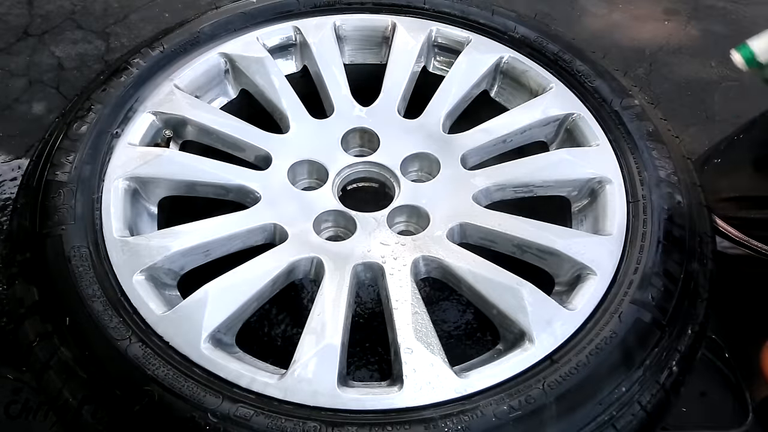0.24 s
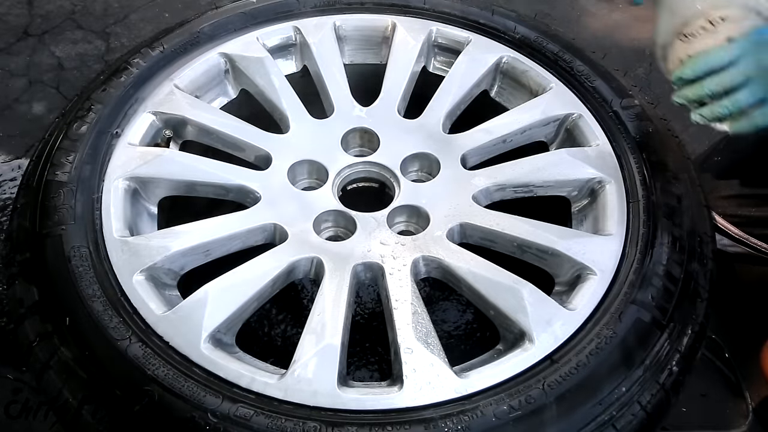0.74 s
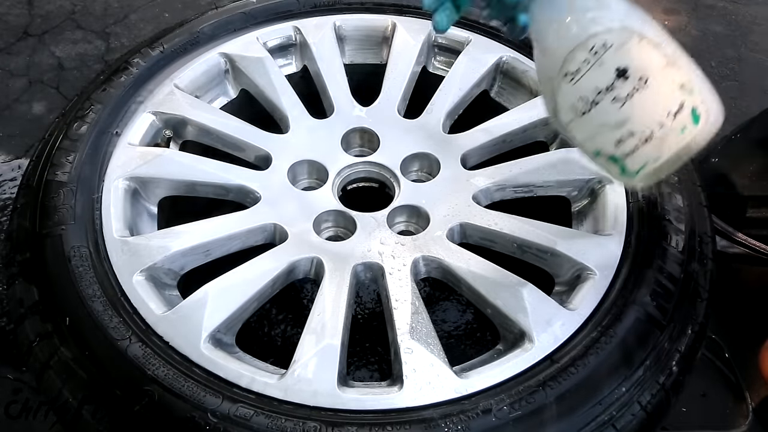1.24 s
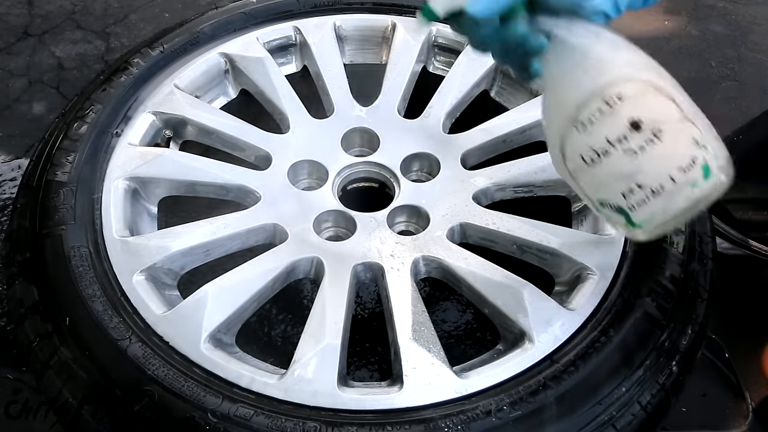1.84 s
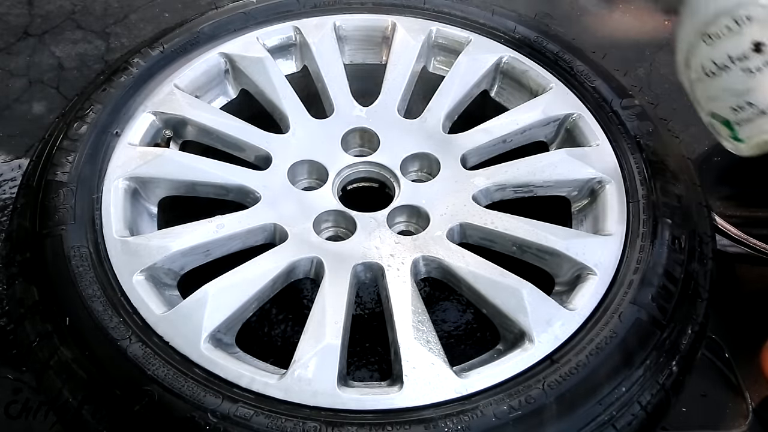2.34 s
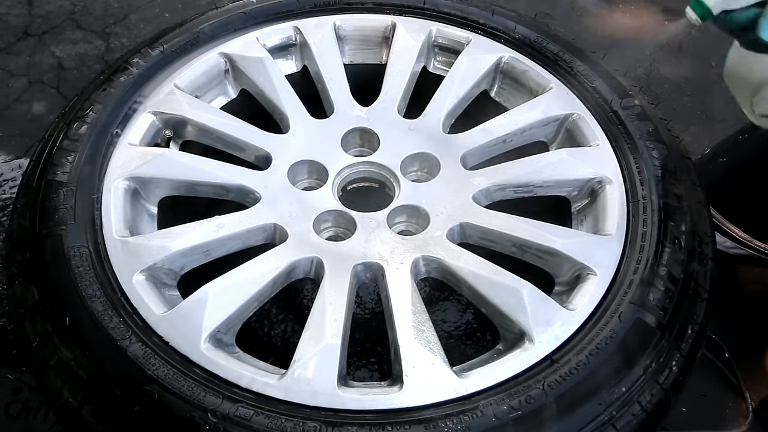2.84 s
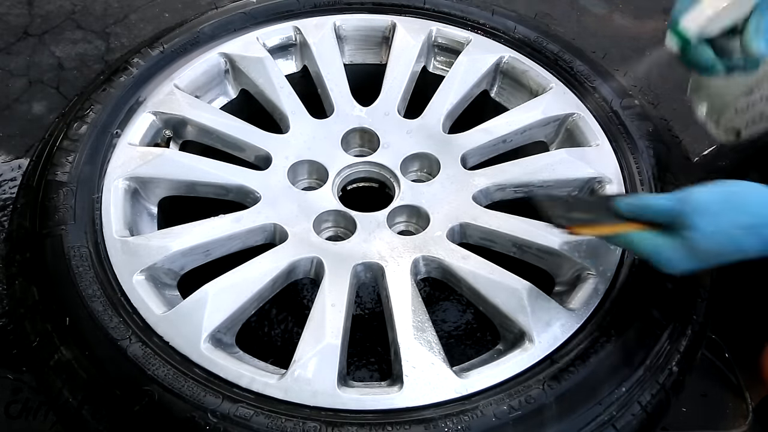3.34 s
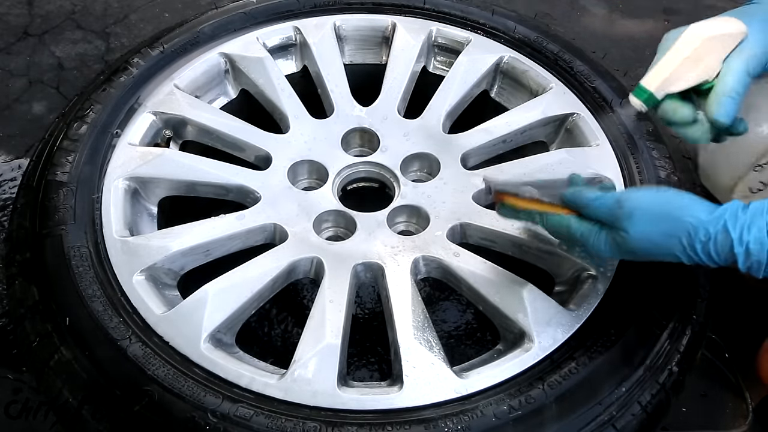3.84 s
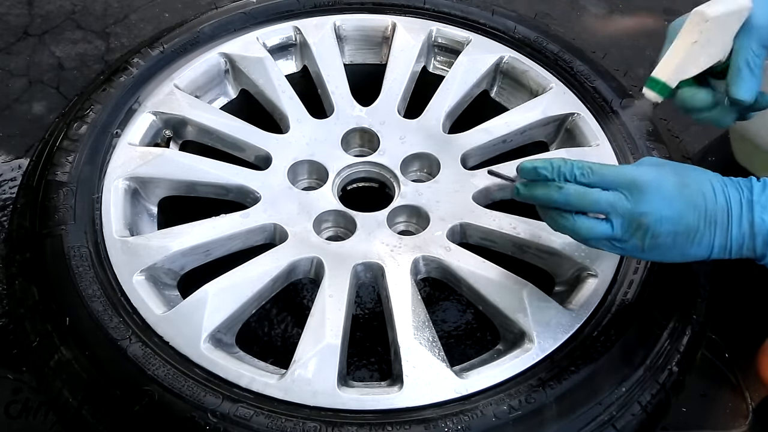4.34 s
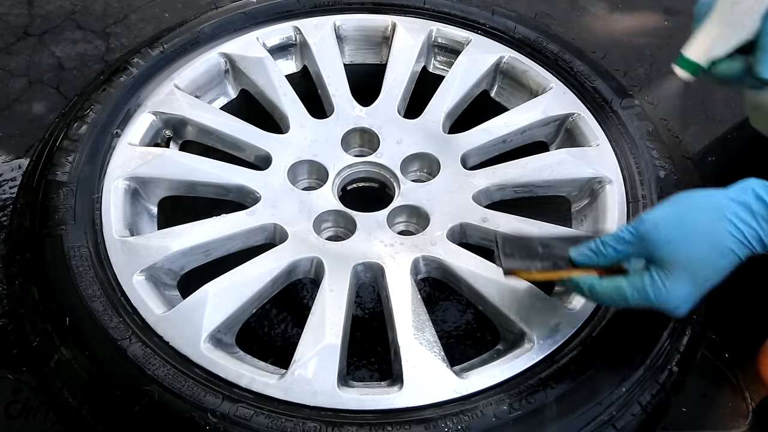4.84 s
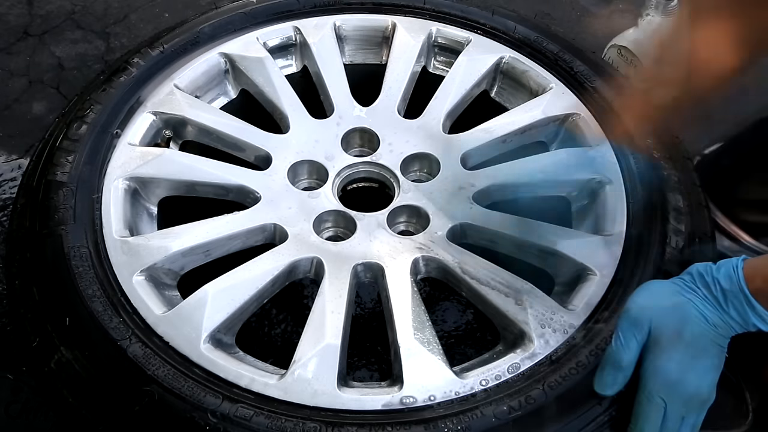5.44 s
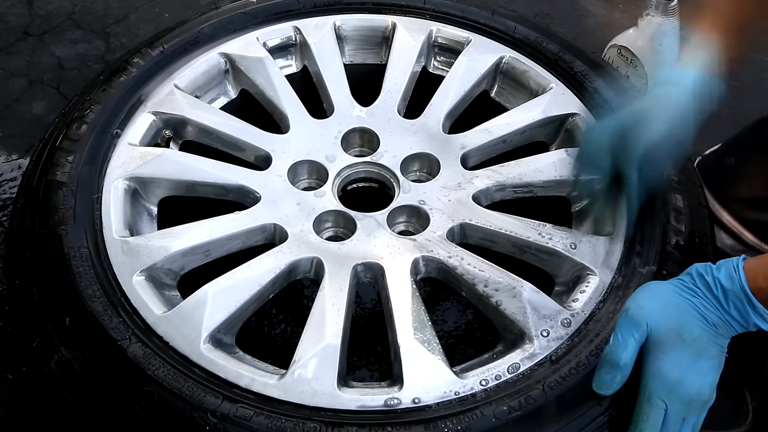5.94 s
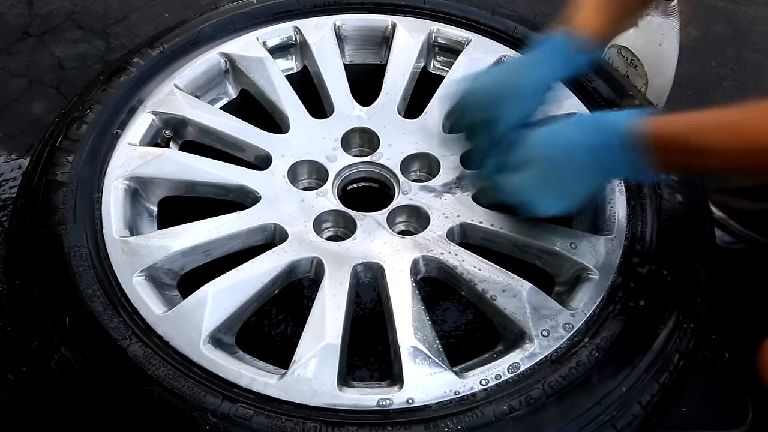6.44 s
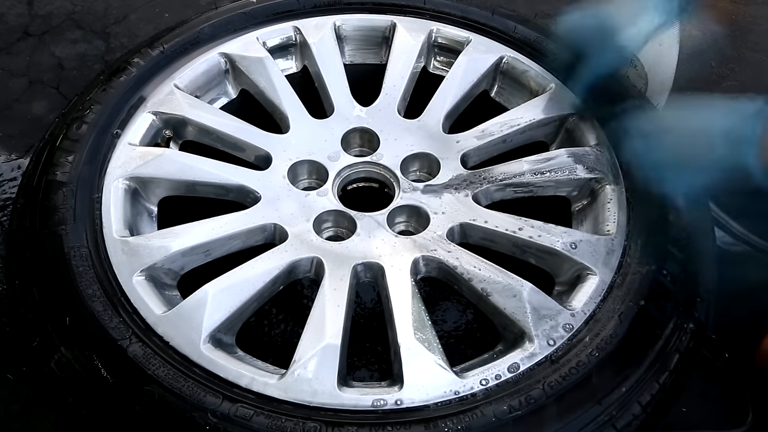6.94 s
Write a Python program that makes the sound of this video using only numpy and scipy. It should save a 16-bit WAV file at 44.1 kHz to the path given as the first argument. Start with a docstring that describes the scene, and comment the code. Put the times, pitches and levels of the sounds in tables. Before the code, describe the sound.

A plastic trigger bottle sprays water onto a metal wheel close to the microphone, about four hissing squirts a second. The trigger clicks and sometimes creaks, with a faint sip between strokes. After a brief pause a second run of squirts follows. The spraying then stops and wet sandpaper rubs the metal softly and unevenly. A faint rumble and distant motor hum fill the garage behind.

```python
"""Trigger spray and wet sanding

A plastic trigger bottle is pumped close by, four times a second. Each stroke drives a hissing turbulent
jet through the nozzle and the return sips water. On some strokes the piston sticks and slips, exciting
cracks in the pump head and thumps in the bottle. Then wet abrasive paper rubs a metal wheel.
Behind lie a diffuse rumble, a far motor hum, a low drone and a thin, high, insect-like band."""
import sys
import numpy as np
from scipy import signal
from scipy.io import wavfile

SR = 44100
rng = np.random.default_rng(int(sys.argv[2]) if len(sys.argv) > 2 else 0)


def log_audio(samples):
    """Write samples as a 16-bit WAV file to the path given in sys.argv[1]."""
    # one column per channel
    frames = np.atleast_2d(samples).T
    # limit to full scale, then quantise
    limited = np.clip(frames, -1, 1)
    pcm = np.round(limited * 32767).astype(np.int16)
    wavfile.write(sys.argv[1], SR, pcm)


N = 316638

# Pump strokes: start_s, peak_s, end_s, jet_db, brightness (steps of 0.36 dB/octave), refill_db
STROKE_CYCLES = [(-0.098, -0.021, 0.043, -22, 5.5, -37), (0.141, 0.219, 0.27, -24.5, 5.5, -35.5),
                 (0.366, 0.451, 0.51, -24.5, 8.5, -38), (0.605, 0.699, 0.76, -24.5, 8, -36),
                 (0.857, 0.914, 1.031, -25.5, 4, -40), (1.097, 1.128, 1.28, -27.5, -1, -56),
                 (1.33, 1.383, 1.465, -28, 1, -34.5), (1.562, 1.63, 1.71, -24.5, 4.5, -33),
                 (1.807, 1.871, 1.955, -25.5, 3, -35), (2.046, 2.113, 2.188, -24, 6, -35),
                 (2.294, 2.36, 2.446, -23.5, 7.5, -35), (2.554, 2.607, 2.725, -25, 6.5, -34.5),
                 (2.79, 2.854, 2.933, -22.5, 9.5, -38.5), (3.393, 3.473, 3.53, -23.5, 6.5, -35),
                 (3.642, 3.69, 3.775, -22, 9, -41), (3.887, 3.936, 4.025, -23, 7.5, -38),
                 (4.127, 4.173, 4.28, -27.5, -6.5, -36), (4.389, 4.438, 4.534, -24, 9.5, -37),
                 (4.629, 4.687, 4.777, -24, 8, -36), (4.86, 4.932, 5.01, -28, -0.5, -36),
                 (5.09, 5.156, 5.24, -24.5, 10, -39)]
# Pause between the end of a stroke and its sip: time_s, delay_s
REFILL_DELAY = [(2.9, 0.034), (3.5, .029)]
# Turbulence spectrum of the jet: frequency_hz, density_db
JET_SPECTRUM = [(400, -7), (600, -5), (2260, -3.5), (3340, 0), (5880, -2.5), (8450, -9), (10000, -8.5),
                (12100, -17), (16000, -20.5)]
# Faint nozzle whistles: pitch_hz, width_hz, level_db (re jet)
NOZZLE_MODES = [(5950, 260, -14), (10100, 350, -16)]
# Resonances of the pump head: pitch_hz, width_hz, level_db
HEAD_MODES = [(1054, 610, -10), (2040, 220, -5), (2426, 234, -4.5), (3334, 210, -3), (4140, 410, -2),
              (5600, 1900, -1.5), (7250, 1360, 0.5), (10100, 2400, -7.5), (12500, 9000, -13.5)]
# Bottle wall resonance under the grip: time_s, pitch_hz
WALL_PITCH = [(1.1, 438), (2.1, 431), (2.28, 333)]
# Emphasis of the head's squeak mode, varying with the grip: time_s, boost_db
SQUEAK_BOOST = [(0.9, 3), (1.05, 9), (1.45, 9), (2.1, 6), (2.25, -3)]
# Runs of piston slips: start_s, length_s, longest_index, longest_stick_s, crack_db, thump_db (re crack)
SLIP_RUNS = [(1.0919, .136, 4.16, 0.025, -10.5, -12), (1.328, .139, 3.99, 0.024, -11, -11),
             (1.5627, .098, 4.07, .0164, -14, -8), (1.8009, .062, 3.46, .0133, -14, -11.5),
             (4.1155, .133, 3.43, .0255, -12, -17), (4.8558, .13, 3.38, 0.025, -11.5, -14)]
# Trigger and valve knocks: time_s, crack_db, thump_db (re crack)
TRIGGER_KNOCKS = [(0.132, -26.5, -25), (0.1499, -23, -10.5), (0.369, -33, -13), (0.3765, -23.5, -21),
                  (0.3836, -23, -16), (0.391, -28, -14), (0.605, -28.5, -28), (0.6178, -34, -4),
                  (0.851, -23, -26), (0.8619, -21, -13.5), (1.0597, -17, -18.5), (1.3018, -27, -5.5),
                  (2.0357, -23, -27), (2.0482, -28.5, -2), (2.2936, -23.5, -13), (2.303, -28, -2),
                  (2.5215, -20, -14.5), (2.5496, -25, -16.5), (2.5595, -27, -5.5), (2.7879, -23.5, -12),
                  (3.028, -28, -16), (3.49, -30.5, -4), (3.5975, -28, -16), (3.625, -23.5, -19),
                  (3.8708, -26, -31), (4.3745, -25.5, -13), (4.3969, -31, -2), (4.619, -25, -14),
                  (5.089, -25, -21), (5.0985, -27.5, -4.5), (5.3256, -29.5, -15)]
# Pings of the trigger meeting its stop: time_s, crack_db
STOP_PINGS = [(1.6884, -32), (1.931, -38), (2.1785, -33), (2.4245, -33.5), (2.676, -43), (2.9665, -40),
              (3.4155, -23)]
# Motion of the sanding hand: time_s, level_db, centre_hz
RUB_MOTION = [(5.25, -58, 4850), (5.39, -44.5, 4600), (5.83, -45, 4530), (5.86, -43, 4280),
              (5.96, -45.5, 4100), (5.985, -54, 3500), (6.01, -46.5, 3360), (6.12, -46.5, 5530),
              (6.29, -42, 4620), (6.35, -55.5, 4500), (6.395, -57.5, 4000), (6.43, -49, 3600),
              (6.84, -46.5, 5650), (6.88, -52.5, 4460), (6.96, -52, 4000), (7.0, -50, 5970),
              (7.18, -52.5, 6600)]
# Friction spectrum of the wet paper: frequency_hz, density_db
PAPER_SPECTRUM = [(600, -15), (1400, -12), (2200, -3.5), (3100, -4), (4500, -7.5), (10000, -9),
                  (16000, -30)]
# Lower edge of the friction hiss: time_s, edge_hz
PAPER_EDGE = [(5.8, 3660), (5.86, 2860), (6.3, 2590), (6.45, 2170), (6.9, 2220), (7.0, 3000)]
# Brief catches of the paper: time_s, scrape_boost_db
PAPER_CATCHES = [(5.503, 5), (5.778, 9.5), (6.024, 7.5)]
# Stereo coherence of near sources: frequency_hz, correlation
NEAR_COHERENCE = [(300, 0.9), (3000, 1), (8000, 0.93), (15000, 0.12)]
# Stereo balance of near sources: frequency_hz, left_minus_right_db
NEAR_PAN = [(600, 5), (1500, 2), (4000, 2), (8000, 1.5), (13000, 1)]
# Spectrum of the diffuse background: frequency_hz, density_db
AIR_SPECTRUM = [(15, -6), (30, -3.5), (108, -2), (680, -15), (1250, -12.5), (4000, -20.5), (7700, -19.5),
                (9500, -30), (16000, -32.5)]
# Level of the diffuse background: time_s, level_db
AIR_ENVELOPE = [(0, -40.5), (2, -43), (5.4, -46.5), (5.55, -54.5), (7.18, -57)]
# Motor hum and insect-like band: pitch_hz, width_hz, level_db (re diffuse background)
HUM_BANDS = [(135.5, 21.4, -10), (261, 25, -15.5), (394, 31, -22), (511.6, 13.6, -19.5), (7530, 500, -23)]
# Low drone that comes and goes: time_s, level_db
DRONE_ENVELOPE = [(0, -51), (1.2, -50), (1.45, -75), (2.25, -52), (2.45, -55), (4.3, -60), (4.7, -55),
                  (5.8, -67.5), (7.18, -62)]
# Stereo coherence of the diffuse background: frequency_hz, correlation
FAR_COHERENCE = [(30, 0.071), (1000, 0.48), (15000, 0.06)]
# Stereo balance of the background: time_s, left_minus_right_db
FAR_PAN = [(5.4, 1.6), (5.55, 0.37)]

SQUEAK_HZ, GROAN_HZ = 3320, 2450   # head modes that a blow may favour


def jet():
    """Turbulent noise grows louder and brighter with pump pressure; the refill sips through the same path."""
    gain, tilt_db = np.zeros(N), np.zeros(N)   # tilt per octave
    impulses = (rng.random(N) < 350 / SR) * np.minimum(rng.exponential(1.0, N), 1.5)
    ticks = signal.lfilter([1], [1, -.97], impulses)
    for start, peak, end, jet_db, brightness, refill_db in STROKE_CYCLES:
        span = np.arange(max(int((start - .03) * SR), 0), int((end + .2) * SR))
        t = span / SR
        phase = np.interp(t, [start - .006, peak, end + 0.0045], [0, .5, 1])
        pressure = np.abs(np.sin(np.pi * phase)) ** 1.86
        if 3.3 < start < 4.8:   # the sanding pad is held in the jet and drips on
            tail = (t > peak) * 0.24 * np.exp(-np.clip(t - end + 0.023, 0, None) / 0.029)
            pressure = np.maximum(pressure, tail)
        valve_crackle = (t > start) * np.exp(-np.abs(t - start) / 0.045) * ticks[span]
        sip_age = np.clip(t - end - np.interp(end, *np.transpose(REFILL_DELAY)), 0, None) / 0.0083
        sip = sip_age * np.exp(-sip_age) + .1 * np.minimum(sip_age, 1) * np.exp(-sip_age / 6.9)
        gain[span] += from_db(jet_db) * (pressure + 0.7 * valve_crackle)
        gain[span] += from_db(refill_db) * sip * (1 + ticks[span])
        tilt_db[span] += (phase > 0) * (phase < 1) * (0.36 * brightness + 4.55 * (pressure - .4))
    drops = from_db(0.55 * drift(510))   # the stream breaks into drops
    hiss = banded_noise(JET_SPECTRUM, NEAR_COHERENCE, 390.7, lambda hz: tilt_db * np.log2(hz / 5000),
                        flicker_db=1.5, grain=drops, balance=NEAR_PAN)
    for hz, width, level_db in NOZZLE_MODES:
        whistle = narrow_noise(hz, width, coherence=0.46)
        hiss += from_db(level_db + 0.44 * drift(1)) * whistle
    return gain * hiss


def blows():
    """Impacts and stick-slip friction excite the pump; a longer stick releases a harder slip."""
    # time_s, crack_db, thump_db (re crack), tilt_db_per_octave, favoured_hz, boost_db
    rows = [(s, db, thump_db, -8.625 - 0.255 * thump_db, SQUEAK_HZ, at_time(SQUEAK_BOOST, s))
            for s, db, thump_db in TRIGGER_KNOCKS]   # less thump, brighter knock
    rows += [(s, db, -32, -4.5, GROAN_HZ, 14) for s, db in STOP_PINGS]
    shortest_s = .0093
    for start, length, longest_index, longest_s, crack_db, thump_db in SLIP_RUNS:
        k = np.arange(12) - longest_index
        sticks = shortest_s + (longest_s - shortest_s) * np.exp(-(k / np.where(k < 0, 1.65, 2.94)) ** 2)
        taper_db = np.where(k < 0, 0.49, .5) * k ** 2
        level_db = crack_db + 0.77 * 20 * np.log10(sticks / longest_s) - taper_db
        for s, db, n in zip(np.cumsum(sticks) - sticks, level_db, k):
            if s < length:   # early slips squeak; later ones groan and thump more
                mode = (SQUEAK_HZ, at_time(SQUEAK_BOOST, start)) if n < -1.3 else (GROAN_HZ, 3)
                rows.append((start + s, db, thump_db + n, -3, *mode))
    return np.transpose(rows)


def pump():
    """Modal response: each blow builds briefly, snaps into the head's resonances and shakes the bottle."""
    time_s, crack_db, thump_db, tilt_db, favoured_hz, boost_db = blows()
    lead = int(.003 * SR)
    onsets = np.round(time_s * SR).astype(int) - lead
    t = np.arange(int(.05 * SR)) / SR
    age = t - lead / SR - .0005
    burst = np.where(age < 0, np.exp(age / 0.00081), np.exp(-age / 0.0015) + 0.18 * np.exp(-age / 0.01))
    noise, crack = stereo_noise(0.92), 0
    scatter_db = rng.normal(0, 1.32, (len(onsets), len(HEAD_MODES)))
    for k, (hz, width, level_db) in enumerate(HEAD_MODES):
        favour_db = boost_db * np.exp(-(np.log2(hz / favoured_hz) / .12) ** 2)
        mode_db = 5.5 + level_db + tilt_db * np.log2(hz / 4200) + favour_db
        clicks = np.zeros(N)
        clicks[onsets] = from_db(crack_db + mode_db + scatter_db[:, k])
        snap = np.roll(clicks, lead) * 1300 / width   # the sharp modes ping at every blow
        ringing = resonance(signal.oaconvolve(clicks, burst)[:N] * noise + snap, hz, width)
        crack += (-1) ** k * ringing * pan(at_hz(NEAR_PAN, hz))
    return crack + bottle_wall(onsets, crack_db + thump_db, t) * pan(5.2)


def bottle_wall(onsets, levels_db, t):
    """Three heavily damped inharmonic modes thump, a little differently at every blow."""
    thump, pitch = np.zeros(N), in_time(WALL_PITCH)[0]
    envelope = (1 - np.exp(-t / 0.0016)) ** 2 * np.exp(-t / 0.0058)
    chance = rng.standard_normal((len(onsets), 3))
    for i, level_db, (detune, lower, upper) in zip(onsets, levels_db, chance):
        phase = 2 * np.pi * pitch[i] * (1 + 0.052 * detune) * t
        wall = np.sin(phase) + 0.2 * lower * np.sin(0.48 * phase)
        wall += (0.42 + 0.067 * upper) * np.sin(1.404 * phase)
        thump[i:i + len(t)] += from_db(level_db + 11.5) * envelope * wall
    return thump


def sanding():
    """Friction of dense wet grit makes soft noise whose level and main band follow the hand."""
    start = int(RUB_MOTION[0][0] * SR)
    t = np.arange(start, N) / SR
    level_db, centre_hz = (curve[start:] for curve in in_time(RUB_MOTION))
    edge_hz = at_time(PAPER_EDGE, t)
    catch_db = sum(db * np.exp(-np.abs(t - s) / np.where(t < s, 0.0097, 0.012))
                   for s, db in PAPER_CATCHES)

    def colour_db(hz):
        treble_db = 6.79 * np.log2(centre_hz / 4500) * max(np.log2(hz / 4000), 0)
        scrape_db = (4.5 + catch_db) * np.exp(-(np.log2(hz / centre_hz) / .4) ** 2)
        low_cut_db = 11 / (1 + (hz / edge_hz) ** 10)
        return np.pad(treble_db + scrape_db - low_cut_db, (start, 0))

    grit = banded_noise(PAPER_SPECTRUM, NEAR_COHERENCE, 606, colour_db,
                        flicker_db=1.3, grain=from_db(1.2 * drift(310)), balance=NEAR_PAN)
    return np.pad(from_db(level_db + 0.75 * catch_db), (start, 0)) * grit


def surroundings():
    """A diffuse, weakly coherent field of rumble and hiss carries narrow hum bands and a wavering drone."""
    air = banded_noise(AIR_SPECTRUM, FAR_COHERENCE, 19.18, lambda hz: 0,
                       flicker_db=2.5, grain=1, balance=[(1, 0)])
    for hz, width, level_db in HUM_BANDS:
        air += from_db(level_db) * narrow_noise(hz, width, coherence=0.83)
    air *= from_db(in_time(AIR_ENVELOPE)[0])
    drone_hz = 68.5 + 2.67 * drift(2.42)
    drone = np.sqrt(2) * np.sin(2 * np.pi * np.cumsum(drone_hz) / SR + [[0], [.6]])
    drone *= from_db(in_time(DRONE_ENVELOPE)[0] + 0.42 * drift(4))
    return (air + drone) * pan(in_time(FAR_PAN)[0])


def banded_noise(spectrum, coherence, low_hz, colour_db, flicker_db, grain, balance):
    """Noise bands add in power, to rms 1 before colour_db(hz) and flicker modulate each one."""
    total, power = 0, 0
    edges = low_hz * 2 ** np.arange(0, np.log2(19000 / low_hz), .4)
    white = rng.standard_normal((2, 2, N)) * grain
    for k, (low, high) in enumerate(zip(edges, edges[1:])):
        bandpass = signal.butter(2, [low, high], "band", fs=SR, output="sos")
        mid, side = signal.sosfilt(bandpass, white[k % 2])
        hz = np.sqrt(low * high)
        band = left_right(mid, side, at_hz(coherence, hz)) * pan(at_hz(balance, hz))
        power += np.mean(band ** 2) * from_db(2 * at_hz(spectrum, hz))
        total += band * from_db(at_hz(spectrum, hz) + flicker_db * drift(43) + colour_db(hz))
    return total / np.sqrt(power)


def narrow_noise(hz, width, coherence):
    """Two resonators in series narrow white noise to a wavering tone of rms 1."""
    return rms_one(resonance(resonance(stereo_noise(coherence), hz, width), hz, width))


def resonance(x, hz, width):
    """A damped two-pole resonator with peak gain 1."""
    r = np.exp(-np.pi * width / SR)
    poles = [1, -2 * r * np.cos(2 * np.pi * hz / SR), r * r]
    return signal.lfilter(np.array([1, 0, -1]) * (1 - r * r) / 2, poles, x)


def stereo_noise(coherence):
    """Partly correlated white noise in two channels."""
    return left_right(*rng.standard_normal((2, N)), coherence)


def left_right(mid, side, coherence):
    """The ratio of sum to difference sets the correlation of the channels."""
    return np.sqrt(1 + coherence) * mid + np.sqrt(1 - coherence) * side * [[1], [-1]]


def drift(rate_hz):
    """Low-passed random fluctuation of rms 1."""
    r = np.exp(-40 * np.pi * rate_hz / SR)
    slow = signal.lfilter([1], [1, -2 * r, r * r], rng.standard_normal(N // 20 + 2002))[2000:]
    return np.interp(np.arange(N) / 20, np.arange(len(slow)), rms_one(slow))


def in_time(rows):
    """Columns of a curve, sample by sample."""
    time_s, *columns = np.transpose(rows)
    return [np.interp(np.arange(N) / SR, time_s, column) for column in columns]


def at_time(points, time_s):
    """Linear interpolation in time."""
    return np.interp(time_s, *np.transpose(points))


def at_hz(points, hz):
    """Interpolation on a log-frequency axis."""
    frequencies, values = np.transpose(points)
    return np.interp(np.log(hz), np.log(frequencies), values)


def pan(db):
    """Left and right gains for a level difference."""
    return from_db(np.array([[.5], [-.5]]) * db)


def from_db(db):
    """Decibels to amplitude ratio."""
    return 10 ** (np.asarray(db) / 20)


def rms_one(x):
    """Normalisation to rms 1."""
    return x / np.sqrt(np.mean(x ** 2) + 1e-20)


def scene():
    """Direct sound interferes with its reflection off the floor, over the surroundings."""
    near = jet() + pump() + sanding() * pan(-1.3)
    lag = 0.000988 * SR * (1 + 0.13 * drift(0.41))   # the hand moves, so the extra path changes
    echo = np.array([np.interp(np.arange(N) - lag, np.arange(N), channel) for channel in near])
    return near + from_db(-18.5) * echo + surroundings()


def record(dry):
    """Soft saturation rounds the peaks; two low-pass filters step the treble down, then cut it."""
    ceiling, step_hz, cutoff_hz = .85, 16000, 16900
    rounded = dry / (1 + (dry / ceiling) ** 4) ** .25
    stepped = signal.sosfilt(signal.cheby2(10, 27, step_hz, fs=SR, output="sos"), rounded)
    return signal.sosfilt(signal.cheby2(16, 50, cutoff_hz, fs=SR, output="sos"), stepped)


dry = scene()
out = record(dry)
log_audio(out)
```